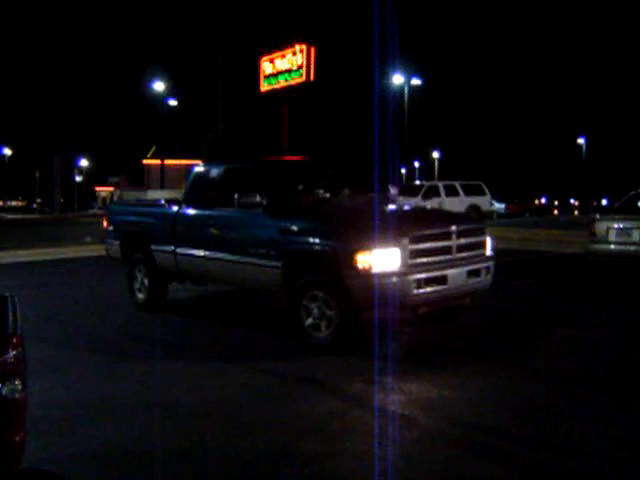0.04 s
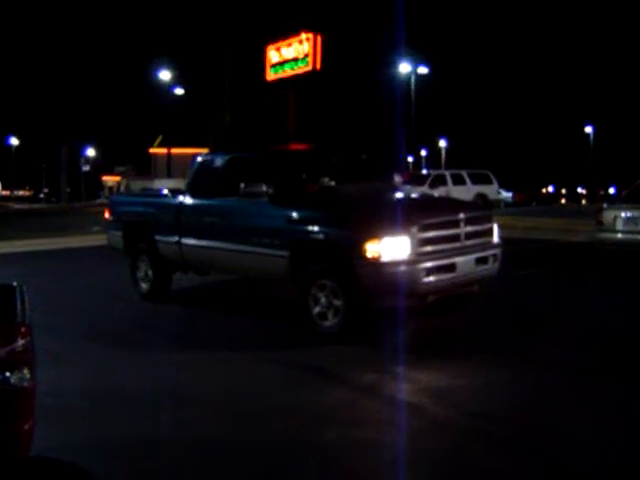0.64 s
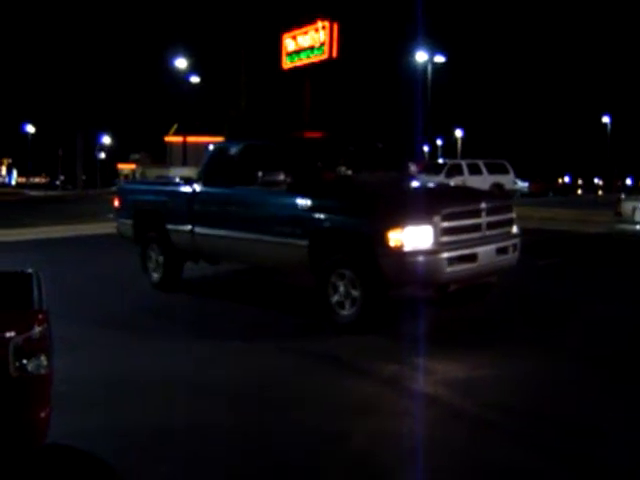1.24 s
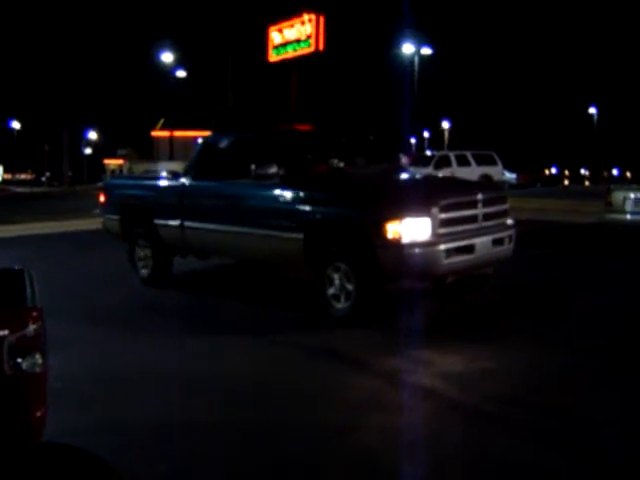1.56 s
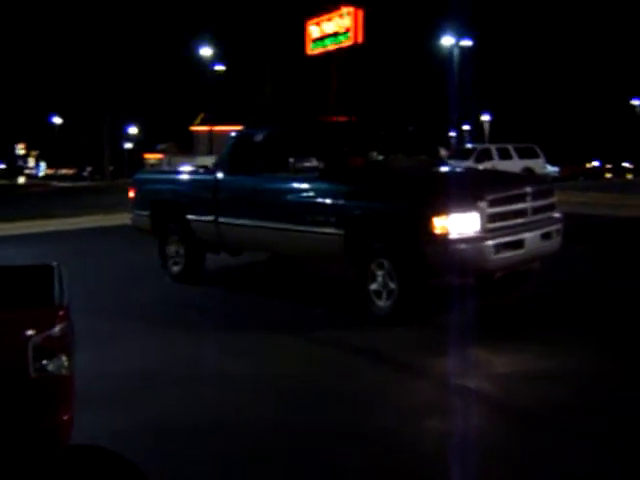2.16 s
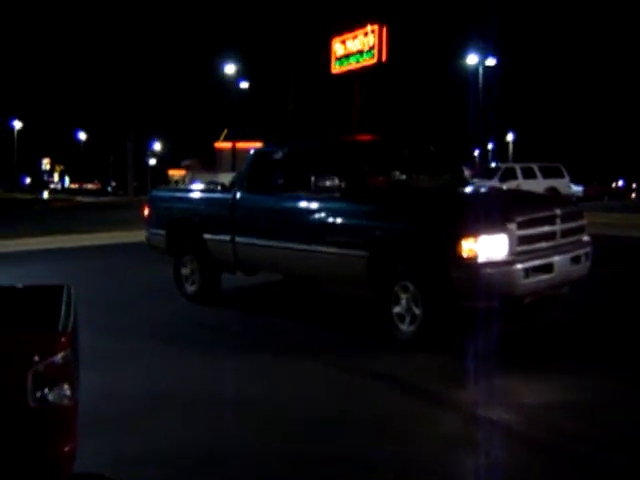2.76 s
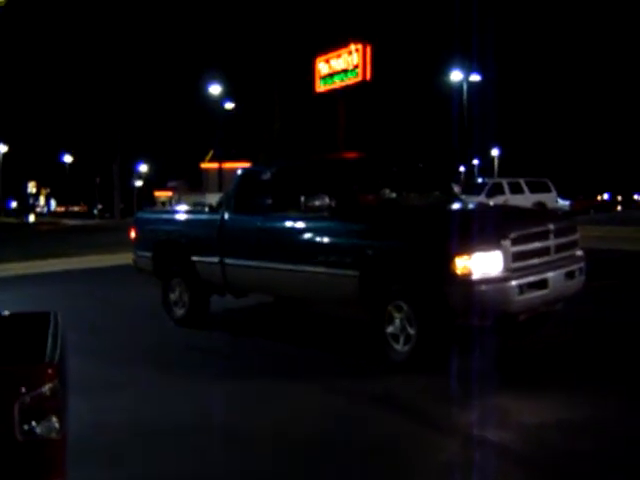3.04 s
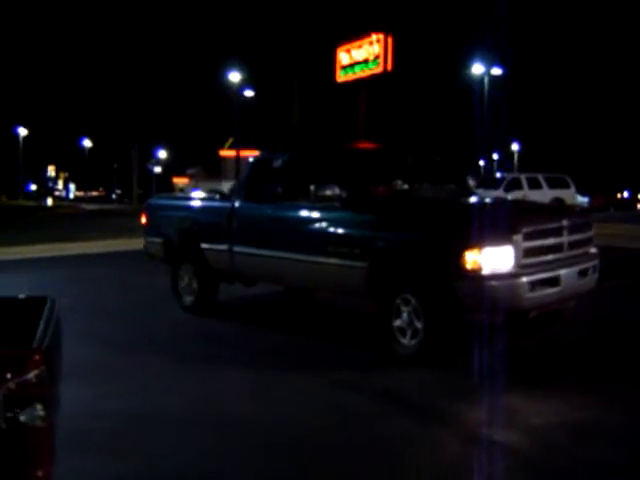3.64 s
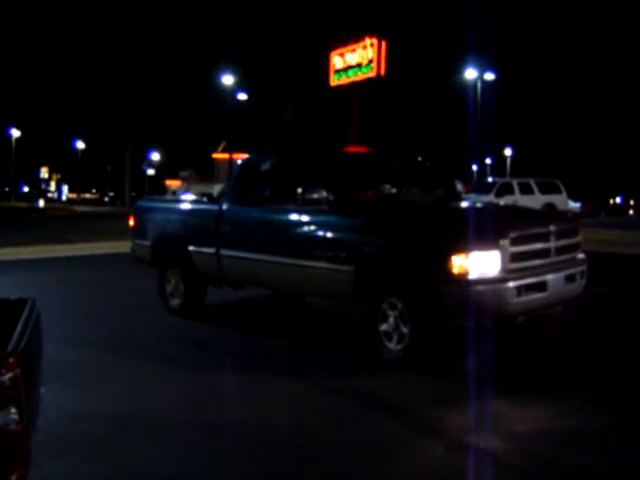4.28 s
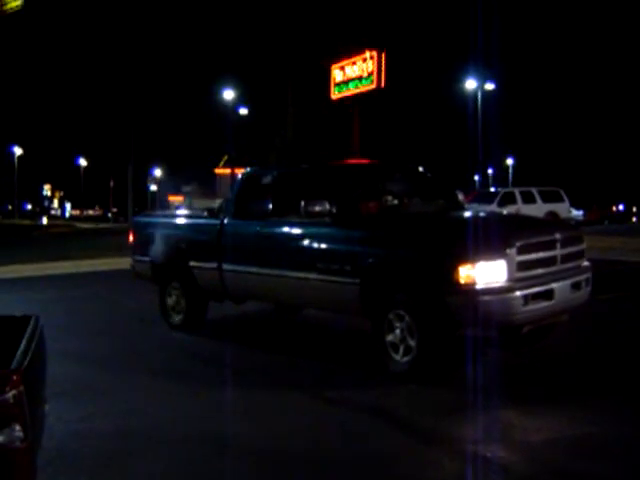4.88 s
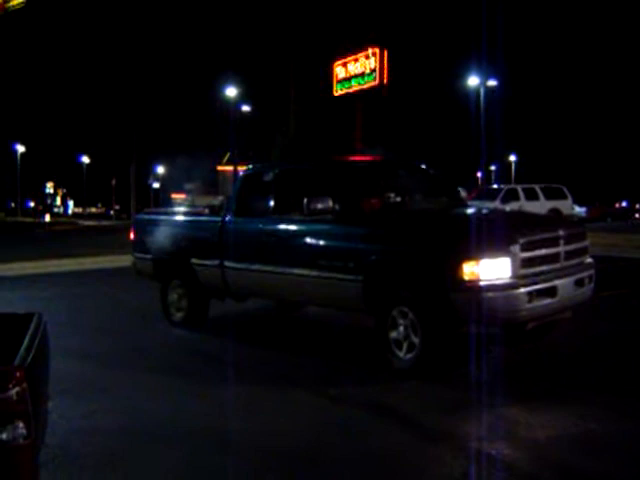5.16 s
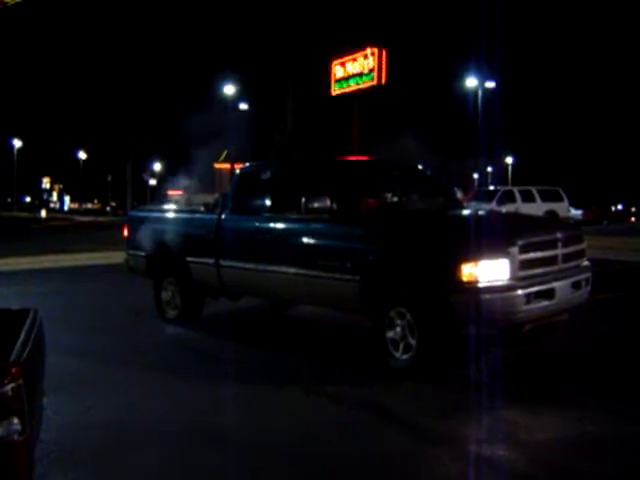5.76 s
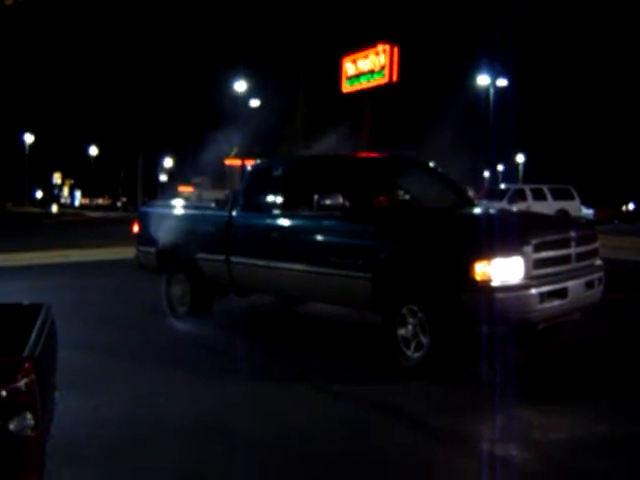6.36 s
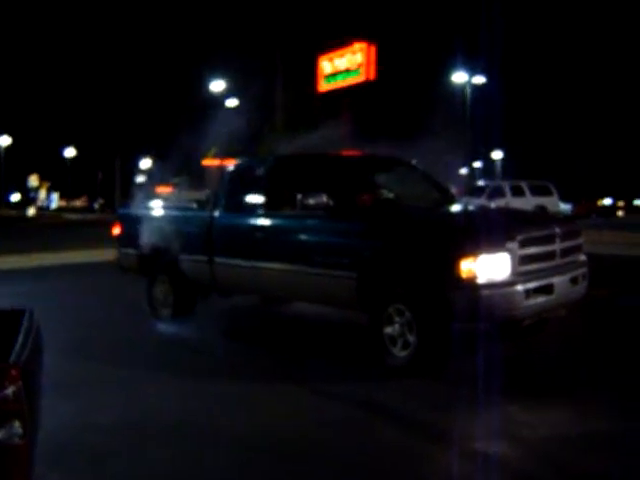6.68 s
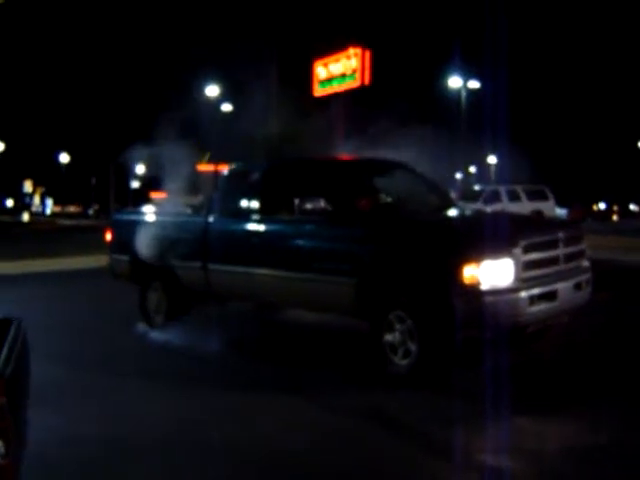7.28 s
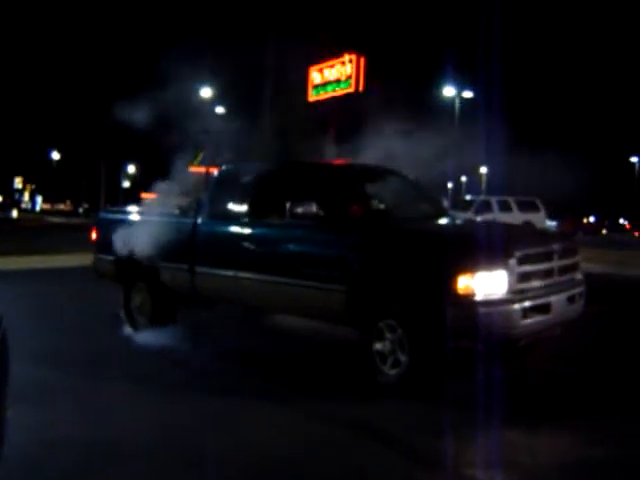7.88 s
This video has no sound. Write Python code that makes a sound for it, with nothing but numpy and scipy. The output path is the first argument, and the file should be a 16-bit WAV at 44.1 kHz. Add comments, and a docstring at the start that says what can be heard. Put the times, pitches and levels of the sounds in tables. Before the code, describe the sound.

A pickup truck's engine cuts in abruptly, already at high revs, in an open parking lot. Its exhaust makes a loud, deep boom with a throbbing burble, over a rough rush of gas and a light fan hiss. The pitch holds nearly steady for two seconds, then creeps upward until the end. The boom is strong at about half a second, eases and throbs more between 2 and 3.5 seconds, then swells again, peaking near 6.5 seconds. Underneath, a spinning rear tyre scrubs hoarsely on the asphalt, growing somewhat louder up to 4 seconds. Around then a faint, ragged, high squeal appears. It becomes clear near 6 seconds, dips briefly, and builds again from 7 seconds. Engine and tyre are still going when the sound ends at about 8 seconds.

```python
"""A V8 pickup's exhaust booms through a burnout in an open parking lot at night, its revs creeping upward.
Uneven firing in the two banks excites harmonics (orders) of the four-stroke cycle; the tail pipe favours
one, and its neighbours beat against it. Turbulent gas rushes out in puffs and the fan hisses. The spinning
rear tyre scrubs louder as it heats, then squeals by stick-slip friction. A reflection off the asphalt
comb-filters the rush, the hiss and the scrub."""
import sys
import numpy as np
from scipy import signal
from scipy.fft import rfft, irfft, next_fast_len
from scipy.io import wavfile
from scipy.ndimage import uniform_filter1d, map_coordinates

SR = 44100
rng = np.random.default_rng(int(sys.argv[2]) if len(sys.argv) > 2 else 0)


def int16_out(signal):
    """Quantize to a 16-bit WAV file."""
    q = np.round(np.clip(np.atleast_2d(signal).T, -1, 1) * 32767)
    wavfile.write(sys.argv[1], SR, q.astype(np.int16))


N = 349272
TIME = np.arange(N) / SR


def gain_of(db):
    """Decibels to amplitude."""
    return 10 ** (np.asarray(db) / 20)


def unit_rms(x):
    """Normalisation to an rms of 1."""
    return x / np.sqrt(np.mean(x ** 2) + 1e-20)


def curves(rows):
    """Linear interpolation of each column of a timed table, sample by sample."""
    time_s, *columns = np.transpose(rows)
    return [np.interp(TIME, time_s, column) for column in columns]


def wander(rate_hz):
    """Random modulation: noise of rms near 1, low-passed at about rate_hz."""
    size, control_hz = 4096, 400
    hz = np.fft.rfftfreq(size, 1 / control_hz)
    slow = irfft(rfft(rng.standard_normal(size)) * np.exp(-(hz / rate_hz) ** 2))
    return np.interp(TIME * control_hz, np.arange(size), unit_rms(slow))


def turbulence(spectrum, envelope):
    """Source and filter: white noise follows an envelope, then takes on a spectrum; rms 1."""
    hz, db = np.transpose(spectrum)
    size = next_fast_len(N)
    colour = gain_of(np.interp(np.log(np.fft.rfftfreq(size, 1 / SR) + 1), np.log(hz), db))
    source = rng.standard_normal(N) * envelope
    return unit_rms(irfft(rfft(source, size) * colour, size)[:N])


def resonate(x, hz, width_hz):
    """A moving resonance by heterodyning: shift hz down to zero, smooth twice, shift back."""
    carrier = np.exp(2j * np.pi * np.cumsum(hz) / SR)
    pole = np.exp(-np.pi * width_hz / SR)
    smoothed = signal.lfilter([(1 - pole) ** 2], [1, -2 * pole, pole * pole], x / carrier)
    return 2 * (carrier * smoothed).real


def puffs(cycles, depth, uneven_db):
    """Pulsating flow: eight decaying blow-downs a cycle, the near bank's stronger on average."""
    near_bank = np.array([1, 0, 0, 1, 0, 1, 1, 0])
    firing, age = np.divmod(8 * (cycles + 1), 1)
    firing = firing.astype(int)
    strength_db = uneven_db * (rng.standard_normal(4096)[firing] + 2 * near_bank[firing % 8])
    return 1 + depth * gain_of(strength_db) * np.exp(-age / 0.66)


# Peak spacing of the ground echo's comb, the inverse of its delay: time_s, spacing_hz
GROUND_COMB = [(0, 742), (2.5, 735), (3.3, 764), (3.8, 816), (4.5, 852), (5.3, 821), (6.7, 781), (7.9, 815)]
def asphalt_echo(x, strength=0.42, dull_hz=4200):
    """Comb filtering: one reflection, dulled by rough ground, its delay drifting as the truck creeps."""
    spacing_hz, = curves(GROUND_COMB)
    dulled = signal.filtfilt(*signal.butter(1, dull_hz, fs=SR), x)
    echo = map_coordinates(dulled, [np.arange(N) - SR / spacing_hz], order=3)
    return (x + strength * echo) / np.sqrt(1 + strength ** 2 / 2)


# Spectrum of the fan and intake hiss: frequency_hz, density_db
FAN_SPECTRUM = [(900, -31), (1800, -9.5), (2300, -1.5), (3000, 0), (3800, -2.5), (4800, -7), (6300, -12.5),
                (8000, -14), (10000, -20.5)]
# Envelope of the hiss: time_s, level_db
FAN_LEVEL = [(.2, -28), (1.6, -30), (2.4, -29), (4.4, -28), (6.6, -29), (7.5, -28.5)]
def fan(cycles):
    """Amplitude modulation: the cylinders lightly chop the turbulent hiss of fan and intake."""
    level_db, = curves(FAN_LEVEL)
    gain = gain_of(level_db + 0.63 * wander(25))
    return gain * turbulence(FAN_SPECTRUM, puffs(cycles, depth=0.18, uneven_db=2.5))


# Squeal of the heated tyre: time_s, pitch_hz, level_db
SQUEAL_TONE = [(3, 853, -61), (4, 896, -44), (5.2, 878, -37), (5.8, 835, -27), (6.4, 857, -33),
               (6.85, 895, -30.5), (7.9, 920, -24.5)]
def tyre_squeal(pitch_spread=0.035, flutter_db=1.0):
    """Stick-slip oscillation of the tread: a ragged tone with a third and a fourth harmonic."""
    pitch_hz, level_db = curves(SQUEAL_TONE)
    phase = 2 * np.pi * np.cumsum(pitch_hz * (1 + pitch_spread * wander(104.3))) / SR
    tone = np.cos(phase) + gain_of(-12) * np.cos(3 * phase) + gain_of(-14) * np.cos(4 * phase)
    return gain_of(level_db) * unit_rms(tone * gain_of(flutter_db * wander(60)))


# Spectrum of sliding rubber: frequency_hz, density_db
SCRUB_SPECTRUM = [(400, -28), (620, -8.5), (760, -5.5), (880, -3.5), (1000, 0), (1150, -5), (1600, -18.5),
                  (4000, -48.5)]
# Envelope of the scrub, growing as the tyre heats: time_s, relative_level_db
SCRUB_LEVEL = [(1, -29), (3.1, -24.5), (3.55, -25.5), (3.9, -22), (4.7, -22.5), (5.6, -23.5), (6.75, -24),
               (7.2, -24.5), (7.9, -24.5)]
def tyre_scrub(trim_db=-2.5, grab_db=0.8):
    """Friction noise: hot rubber grabs and slips on the asphalt, a hoarse band near 900 Hz."""
    level_db, = curves(SCRUB_LEVEL)
    grip = gain_of(grab_db * wander(32))
    return gain_of(level_db + trim_db) * turbulence(SCRUB_SPECTRUM, grip)


# Spectrum of the gas leaving the tail pipe: frequency_hz, density_db
GAS_SPECTRUM = [(20, -22), (60, -15.5), (130, -10), (280, 5.5), (400, 6), (520, -3.5), (680, -0.5),
                (1000, -8), (1200, 0), (1400, -4), (1700, -1.5), (2000, -6), (3000, -32.5), (8000, -37.5)]
# Envelope of the hollow resonance in the rush: time_s, relative_level_db
RASP_LEVEL = [(.2, -3), (1.6, -9.5), (3.1, -2), (3.8, -8.5), (5.3, -12), (6.2, -6), (7.9, -15.5)]
def exhaust_rush(cycles, gas_db=1.0, rasp_width_hz=190, sag_db_per_s=0.24):
    """Jet noise: gas leaves the tail pipe in puffs, exciting one hollow resonance."""
    spacing_hz, = curves(GROUND_COMB)
    rasp_db, = curves(RASP_LEVEL)
    flow = puffs(cycles, depth=0.78, uneven_db=0.5)
    gas = gain_of(gas_db) * turbulence(GAS_SPECTRUM, flow)
    rasp_hz = 1.888 * spacing_hz  # near the second peak of the ground comb
    rasp = unit_rms(resonate(rng.standard_normal(N) * flow, rasp_hz, rasp_width_hz))
    level_db = -25.5 - sag_db_per_s * TIME + 0.75 * wander(13)
    return gain_of(level_db) * (gas + gain_of(rasp_db) * rasp)


BOOM_ORDER = 13  # the harmonic that the tail pipe favours
def partial(cycles, order, level_db, drift_rad=0.4, dispersion_rad=0.58):
    """Dispersion: the pipe gives an order its own phase lag, spreading each cycle into one long throb."""
    lag = dispersion_rad * (order - BOOM_ORDER) ** 2 + drift_rad * wander(0.55)
    return np.sqrt(2) * gain_of(level_db) * np.cos(2 * np.pi * order * cycles - lag)


def order_mix(table, cycles, rpm, level_db, waver_db, low_rpm=2237, high_rpm=2656):
    """Superposition of wavering orders whose balance shifts from low revs to high revs."""
    revs = np.clip((rpm - low_rpm) / (high_rpm - low_rpm), 0, 1)
    mix = np.zeros(N)
    for order, low_db, high_db in table:
        order_db = level_db + low_db + revs * (high_db - low_db) + waver_db * wander(0.9)
        mix += partial(cycles, order, order_db, drift_rad=0.31)
    return mix


# Envelope of the bass hum: time_s, level_db
HUM_LEVEL = [(.2, -33.5), (1.9, -36), (3.7, -39.5), (4.6, -33), (5.9, -38), (6.9, -32), (7.9, -48)]
# Envelope of the high overtone that sings out as the revs climb: time_s, level_db
OVERTONE_LEVEL = [(.2, -35.5), (1.1, -32), (2.3, -40), (2.9, -29.5), (3.3, -31.5), (3.7, -41), (3.9, -31),
                  (5.1, -28.5), (5.6, -33.5), (6.1, -47), (7.2, -34.5)]
def hum_and_overtone(cycles, hum_order=5, overtone_order=32):
    """Harmonics of the engine cycle: one low and one high clean tone in the exhaust note."""
    hum_db, = curves(HUM_LEVEL)
    overtone_db, = curves(OVERTONE_LEVEL)
    return partial(cycles, hum_order, hum_db) + partial(cycles, overtone_order, overtone_db)


# Orders that swell and fade: order, level_db, depth_ratio, mode_spacing_hz
SWELLING_ORDERS = [(10, -31.5, 0.5, 16.0), (16, -32, 0.3, 35.5), (22, -36.5, 1, 35.4), (27, -40.5, .6, 43)]
def swells(cycles, rpm):
    """Standing waves: orders rise and fall as the climbing revs carry them from one mode to the next."""
    cycle_hz = rpm / 120
    mix = np.zeros(N)
    for order, level_db, depth, spacing_hz in SWELLING_ORDERS:
        response = abs(1 + depth * np.exp(2j * np.pi * order * cycle_hz / spacing_hz))
        mix += partial(cycles, order, level_db) * unit_rms(response)
    return mix


# Lesser harmonics of the four-stroke cycle: order, low_revs_db, high_revs_db
BURBLE_ORDERS = [(3, -54, -54), (6, -46.5, -36.5), (7, -38, -49.5), (8, -28, -34), (9, -29.5, -43.5),
                 (11, -58, -33.5), (12, -42.5, -48), (15, -30, -46), (17, -35.5, -39), (19, -38, -49.5),
                 (20, -40, -54), (21, -31.5, -34.5), (23, -33, -45), (26, -37, -42), (33, -41.5, -55),
                 (35, -43.5, -39.5), (37, -41.5, -36), (38, -40.5, -40.5), (39, -38, -45),
                 (40, -35.5, -41.5), (41, -50, -37), (42, -34, -45.5), (43, -45, -43.5), (45, -35.5, -38)]
def burble(cycles, rpm):
    """Fourier series: uneven firing in each bank repeats once a cycle and fills in the other orders."""
    return order_mix(BURBLE_ORDERS, cycles, rpm, level_db=0, waver_db=2.14)


# Envelope of the boom: time_s, level_db
BOOM_LEVEL = [(.15, -13.5), (.4, -11), (.75, -16), (1.7, -17.5), (2.3, -25), (2.8, -18.5), (3.3, -18.5),
              (4.1, -15.5), (5.6, -15), (6.6, -12.5), (7.25, -19.7)]
# Shared envelope of the side tones that beat against it: time_s, level_db
THROB_LEVEL = [(.3, -32.5), (.75, -35), (1.5, -31), (2.2, -25.5), (2.72, -29.5), (2.9, -25.5), (3.4, -24.5),
               (4.2, -28.5), (5.1, -37), (7.9, -37)]
# The side tones, relative to that envelope: order, low_revs_db, high_revs_db
THROB_ORDERS = [(14, -0.5, 3.5), (18, 1.5, -2)]
def boom(cycles, rpm, shake=0.031):
    """Resonance and beating: the tail pipe favours one order, and nearby orders make it throb."""
    boom_db, = curves(BOOM_LEVEL)
    throb_db, = curves(THROB_LEVEL)
    main_tone = partial(cycles, BOOM_ORDER, boom_db, drift_rad=0.099)
    side_tones = order_mix(THROB_ORDERS, cycles, rpm, throb_db, waver_db=1.5)
    return (main_tone + side_tones) * (1 + shake * wander(63))


def lope(cycles, depth=0.18, centre_cycles=0.57, width_cycles=0.15):
    """Periodic modulation: a weak spot in the firing order dips the note once a cycle."""
    return 1.05 - depth * np.exp(-((cycles % 1 - centre_cycles) / width_cycles) ** 2)


# Engine speed, creeping up with the throttle held down: time_s, speed_rpm
ENGINE_SPEED = [(0.1, 2315), (0.35, 2336), (0.65, 2303), (0.9, 2286), (1.2, 2285), (1.7, 2293),
                (2.15, 2308), (2.55, 2342), (2.9, 2384), (3.55, 2418), (3.95, 2461), (4.3, 2501),
                (5.05, 2556), (5.35, 2553), (5.95, 2599), (6.55, 2615), (7.2, 2670), (7.9, 2696)]
def crank(jitter_cycles=0.00076, skip_at_s=6.491, skip_cycles=0.03, skip_length_s=0.00099):
    """Phase as the integral of speed: one four-stroke cycle per two turns."""
    rpm, = curves(ENGINE_SPEED)
    # the sound skips once: a brief dropout jolts the note
    skip = skip_cycles * np.clip((TIME - skip_at_s) / skip_length_s + 0.5, 0, 1)
    cycles = np.cumsum(rpm / 120) / SR + jitter_cycles * wander(14) - skip
    return cycles, rpm


def scene():
    """Superposition: one crank drives the exhaust note and chops the flow noises; the tyre joins them."""
    cycles, rpm = crank()
    throbbing = lope(cycles) * (boom(cycles, rpm) + burble(cycles, rpm))
    note = throbbing + swells(cycles, rpm) + hum_and_overtone(cycles)
    roar = exhaust_rush(cycles) + fan(cycles) + tyre_scrub()
    return (note + asphalt_echo(roar) + tyre_squeal())[None]


def record(dry, target_db=-14, squeeze=0.32, smooth_s=0.2, start_s=0.0803, cutoff_hz=10130):
    """Compression ducks the whole mix as the boom swells; the sound cuts in abruptly, low-passed."""
    power_db = 10 * np.log10(uniform_filter1d(dry[0] ** 2, int(smooth_s * SR)) + 1e-12)
    levelled = dry * gain_of(squeeze * (target_db - power_db))
    onset = np.clip((TIME - start_s) / 0.0025 + 0.5, 0, 1)
    low_pass = signal.firwin(801, cutoff_hz, window=("kaiser", 9), fs=SR)
    return signal.oaconvolve(levelled * onset, low_pass[None], "same")


dry = scene()
out = record(dry)
int16_out(out)
```